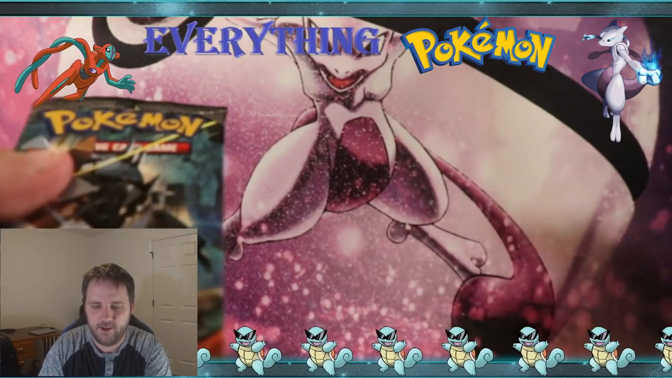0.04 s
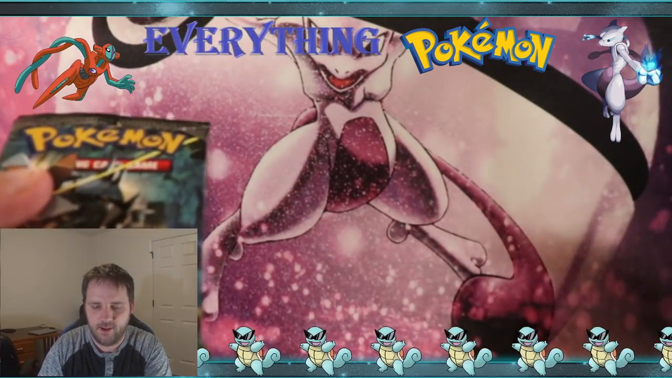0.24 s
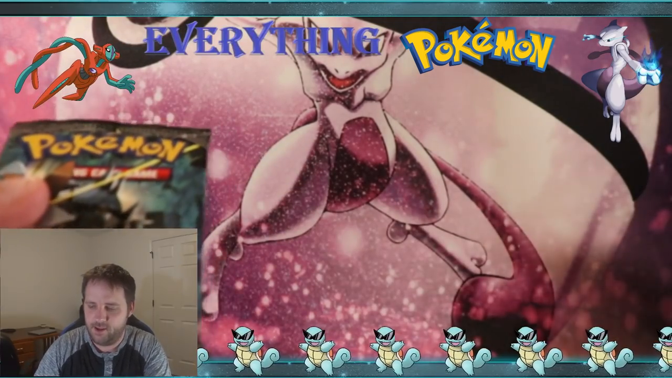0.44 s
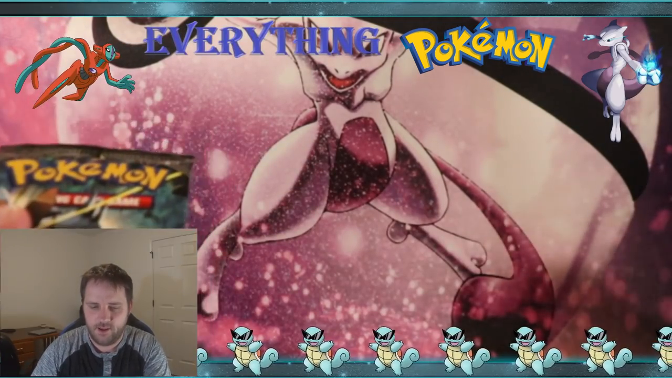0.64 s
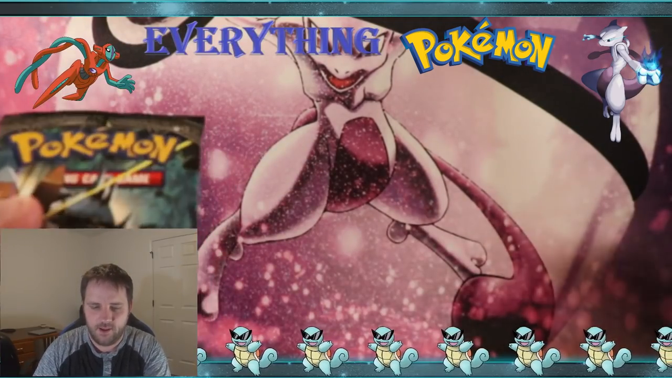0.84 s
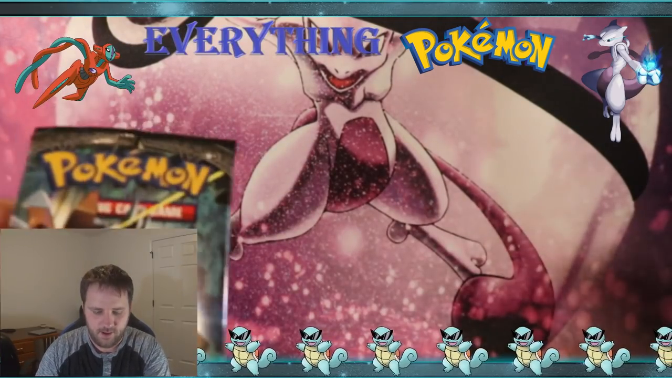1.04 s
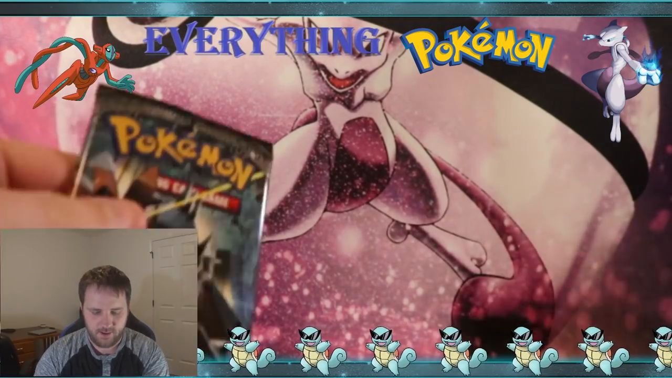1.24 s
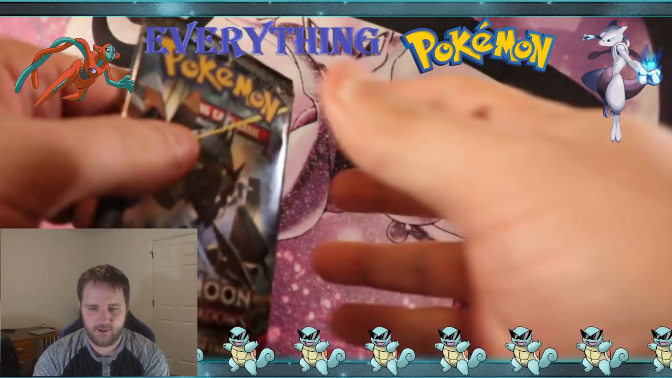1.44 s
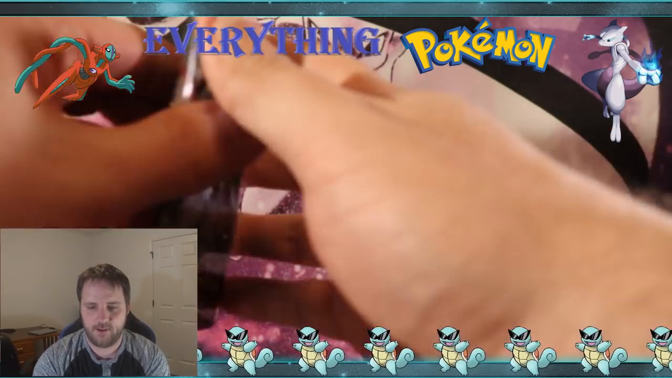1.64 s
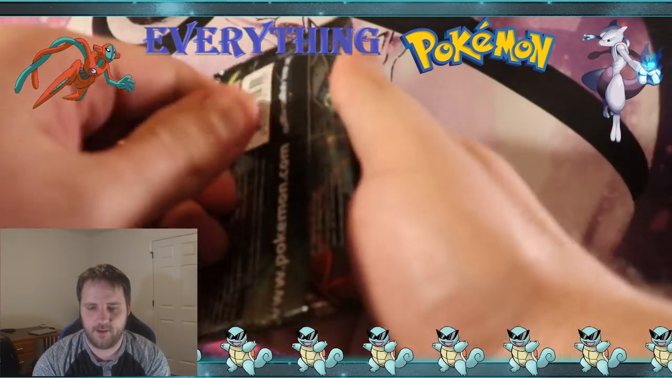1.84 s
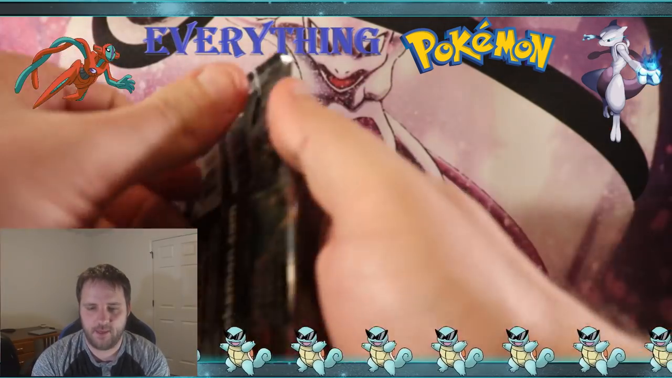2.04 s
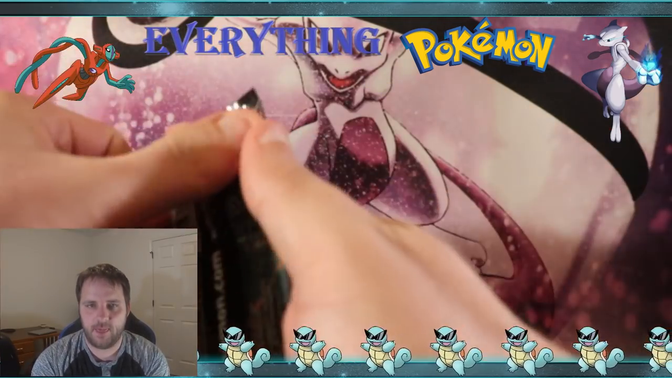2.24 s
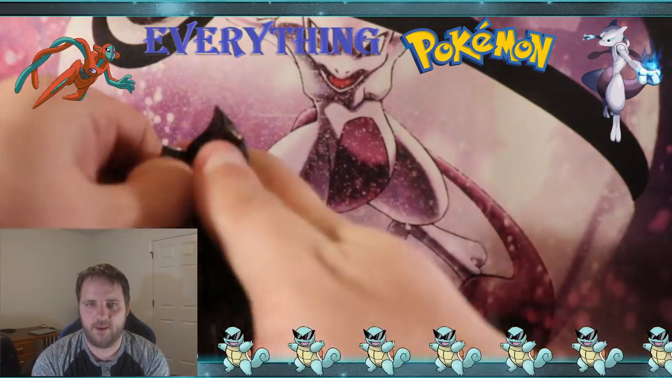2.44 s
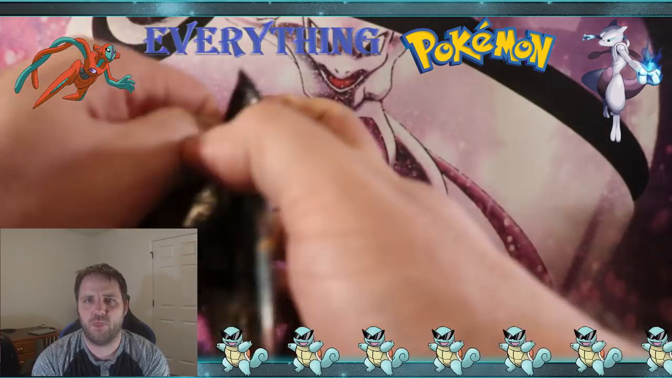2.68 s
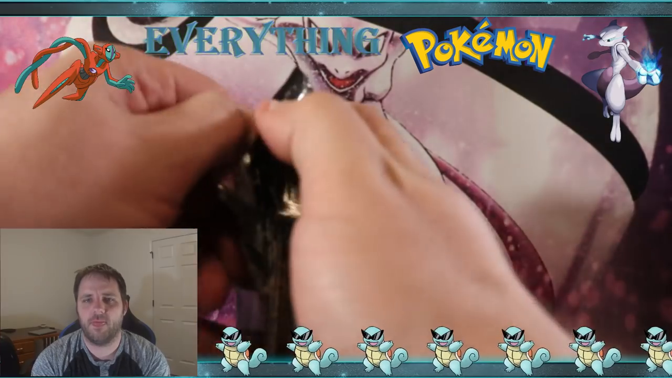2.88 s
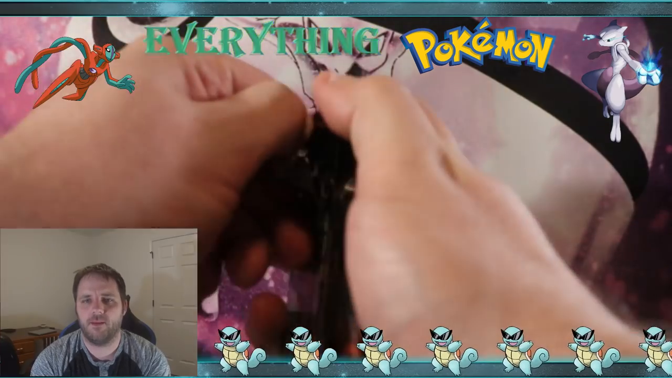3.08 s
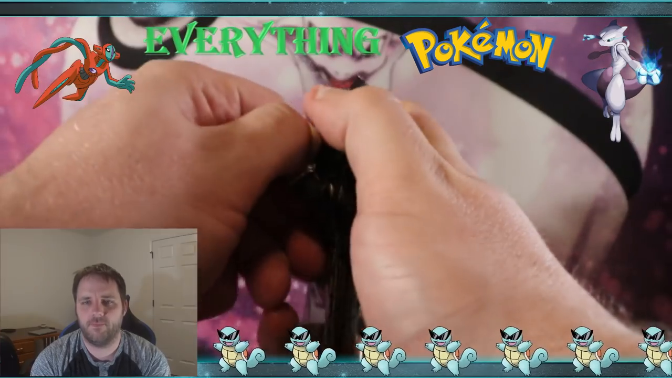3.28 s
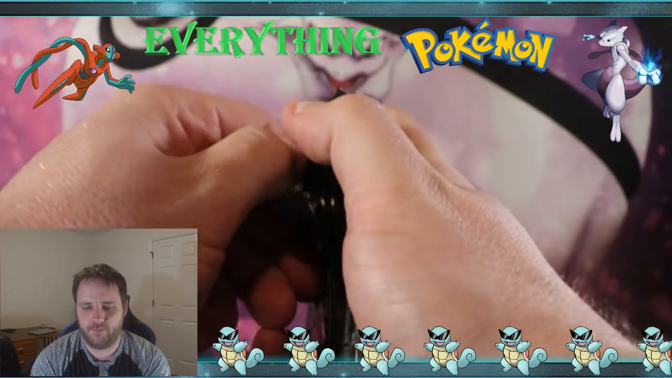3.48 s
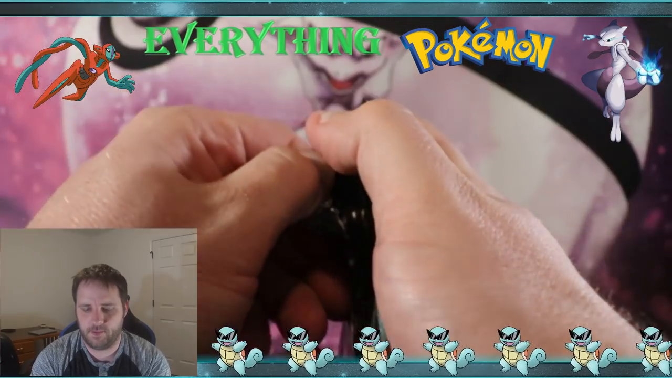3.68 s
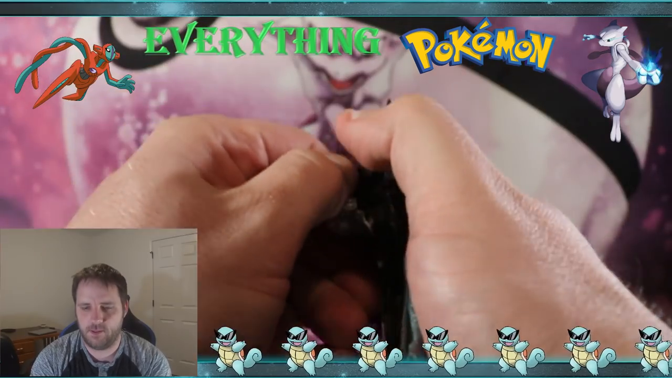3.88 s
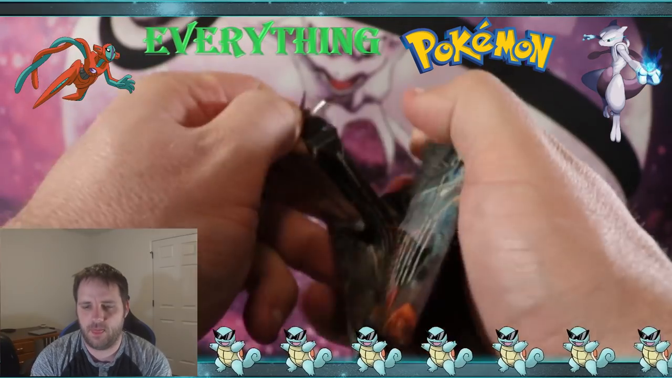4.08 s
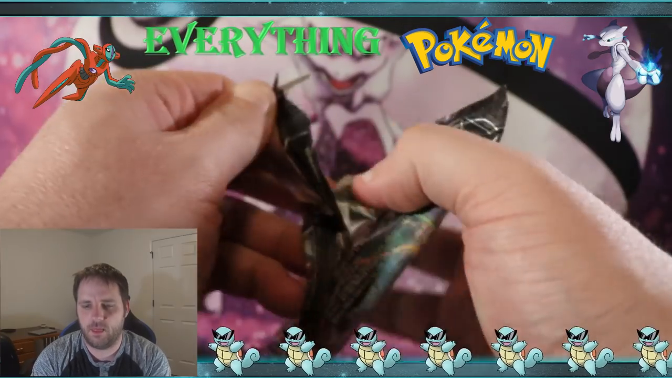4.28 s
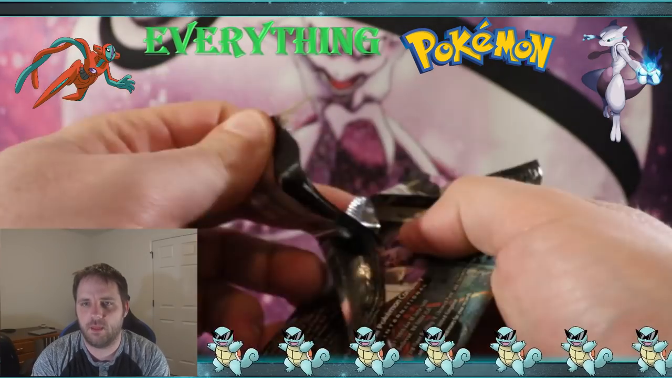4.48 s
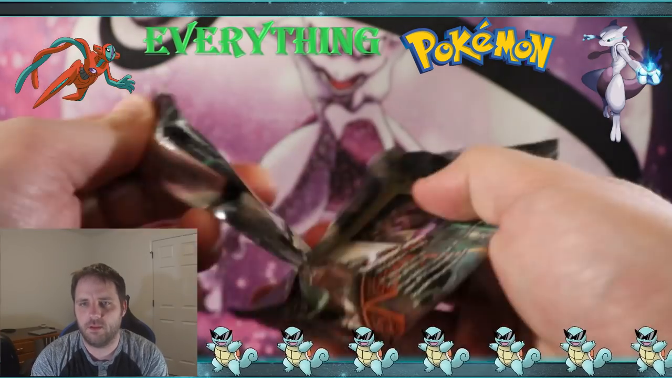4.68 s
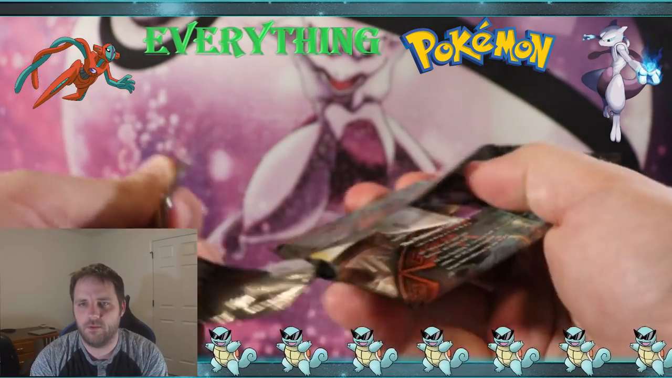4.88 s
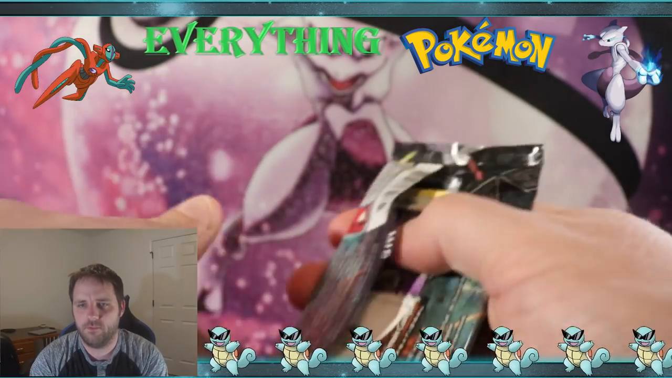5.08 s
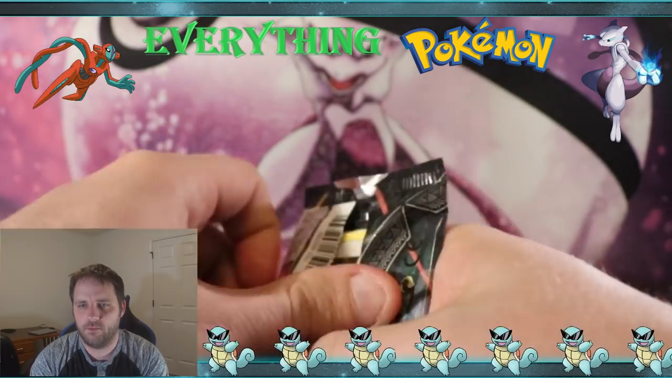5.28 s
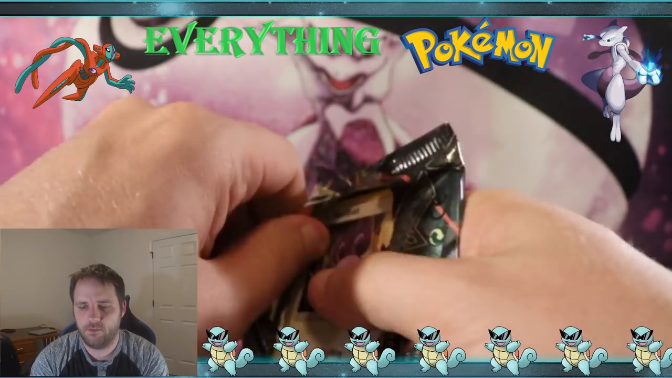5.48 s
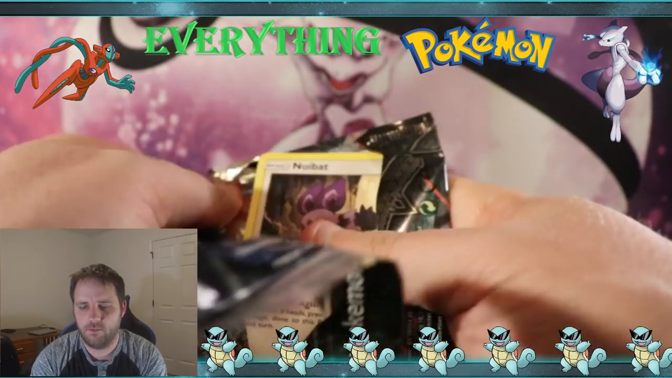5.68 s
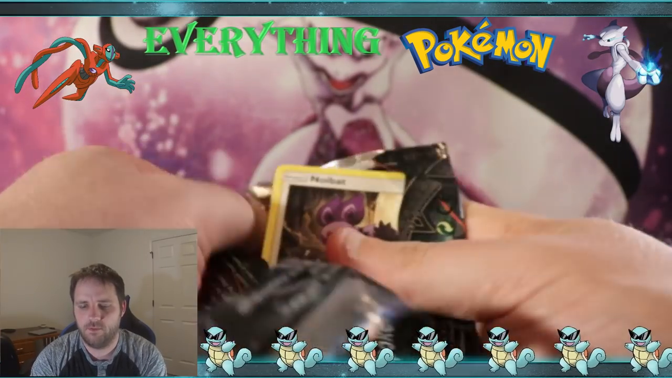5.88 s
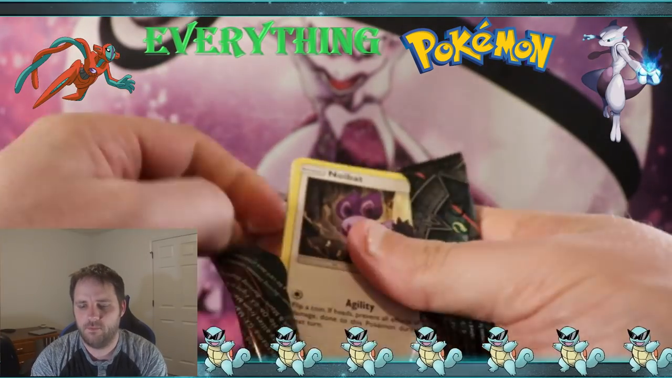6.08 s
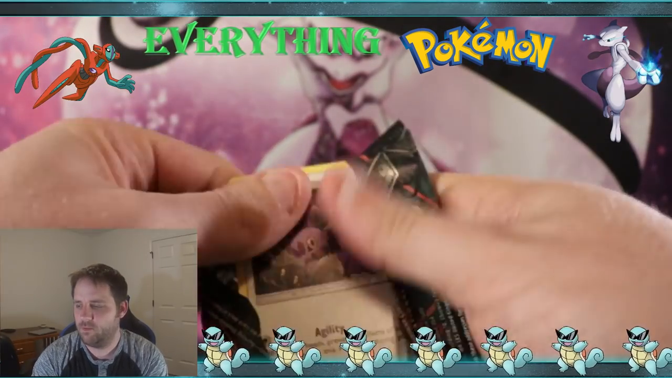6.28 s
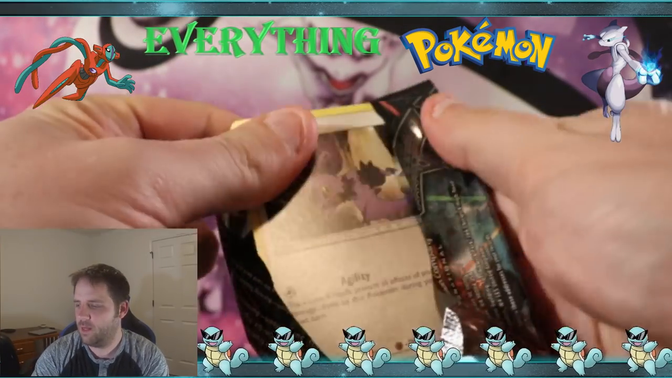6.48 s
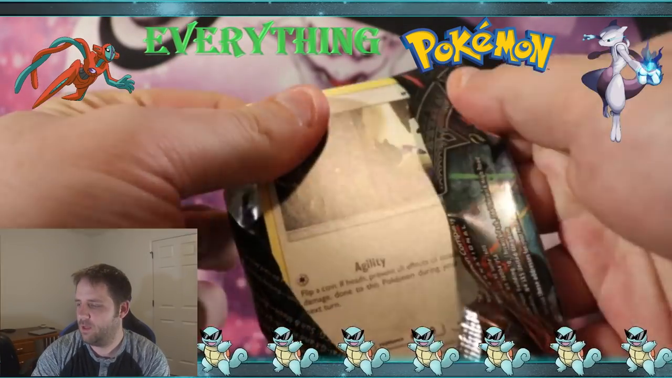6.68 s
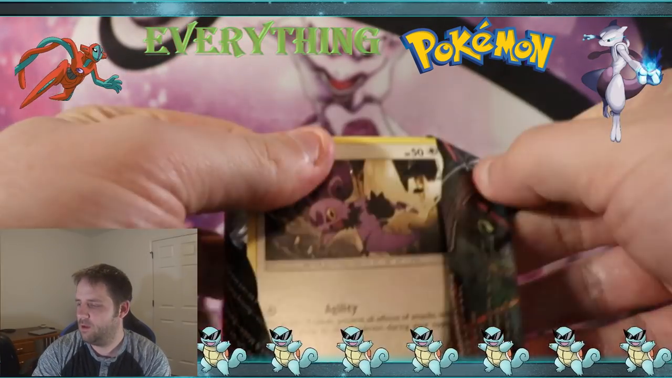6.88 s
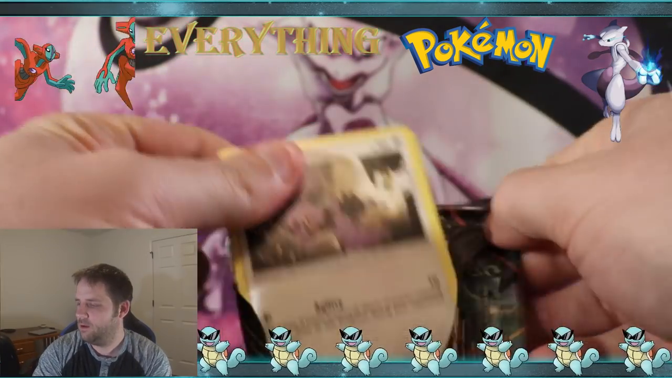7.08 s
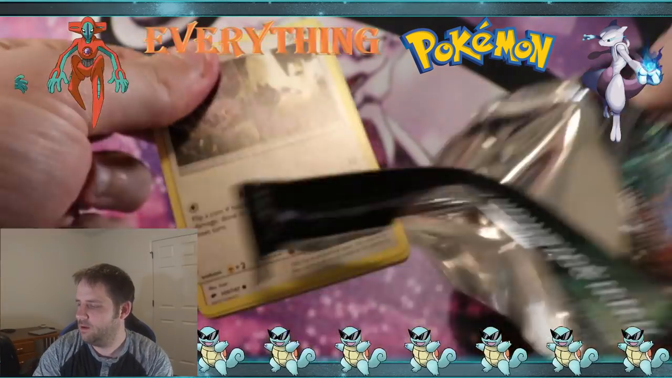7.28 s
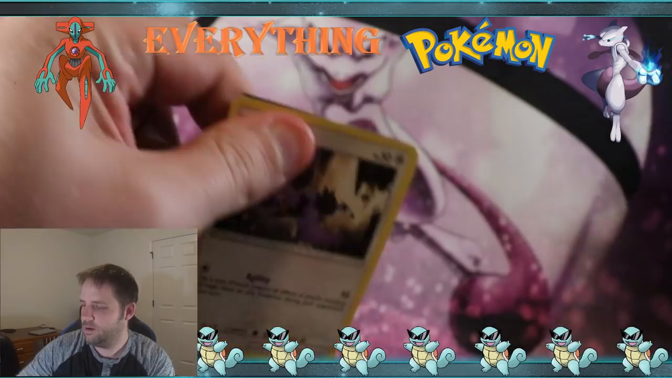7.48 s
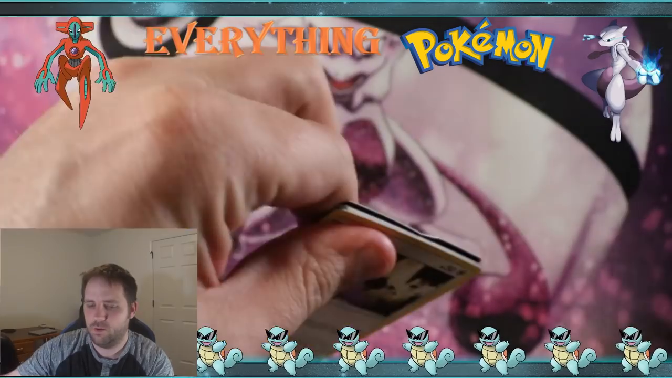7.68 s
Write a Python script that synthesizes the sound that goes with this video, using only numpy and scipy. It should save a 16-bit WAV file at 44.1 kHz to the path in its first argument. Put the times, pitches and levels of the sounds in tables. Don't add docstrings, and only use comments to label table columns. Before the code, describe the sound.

Hands work a glossy foil wrapper over a desk, heard at a little distance by one microphone. Soft rubbing and isolated clicks come first, then bright scattered pops, a pause, a sudden ripping crackle, and busy papery crinkling as the flap peels and cards come free. Dull knocks sit underneath; hard walls briefly answer each snap over a low steady room tone.

```python
import sys
import numpy as np
from scipy import signal
from scipy.fft import rfft, irfft
from scipy.io import wavfile

SR = 44100
rng = np.random.default_rng(int(sys.argv[2]) if len(sys.argv) > 2 else 0)


def transcribe(u):
    v = np.clip(np.atleast_2d(u).T, -1, 1)
    q = np.round(v * 32767).astype(np.int16)
    wavfile.write(sys.argv[1], SR, q)


def natural_amplitude(level_db):
    exponent = np.asarray(level_db, float) / 20
    return 10 ** exponent


N = 340363
LEAD = 4096
BODY_HZ = 1800
MIDDLING_DB = -18.5

# (frequency [Hz], level [dB per Hz])
FOIL_COLOUR = [(180, -26.5), (300, 16.5), (600, 6.5), (850, 3.5), (1100, -2), (1650, -1.5), (2270, -1),
               (2900, 3), (5000, 3.5), (7000, 4), (8200, 3.5), (9200, -6.5), (11500, -16), (13000, -19),
               (14500, -30.5), (16000, -73.5)]


def snaps():
    # (time [s], peak [dB], ring [Hz], body 0.7-1.8 kHz [dB], share to the walls [dB])
    earlier_snap = [
        (-0.02, -24, 9500, -27, 2.7),
    ]
    lift_snaps = [(0.1475, -44, 2000, -9, 3), (0.256, -45.5, 4500, -28, 12), (0.748, -47.5, 2010, -15, 12),
                  (0.775, -46, 1325, -15, 7), (0.796, -40.5, 2900, -8, 4), (0.8095, -39, 2490, -6, 1),
                  (0.816, -46, 3300, -20, 0), (0.827, -43, 2600, -20, 0), (0.845, -50, 3500, -20, 0),
                  (0.862, -48, 2300, -15, -2), (0.877, -42, 1950, -7, 5), (0.889, -41, 1040, -6, 4),
                  (0.9, -31.5, 7950, -11, 2), (0.9589, -20, 4260, -12.5, 0.5),
                  (1.062, -37.5, 3810, -20, 13), (1.1375, -21.5, 4460, -21, 3),
                  (1.144, -28.5, 4860, -22, -4), (1.453, -51.5, 1120, -31, 7.5), (1.662, -48, 2760, -26, 8),
                  (1.732, -50, 2190, -25, 20), (1.7892, -29, 2730, -17.5, 2), (1.843, -17.5, 4230, -29, 0),
                  (1.945, -29.5, 4840, -18, -1.5), (2.0192, -36.5, 3100, -22, 5),
                  (2.0528, -16.5, 3100, -49, -2), (2.089, -13, 4100, -33, -4)]
    grip_snaps = [(2.271, -12.5, 4100, -25.5, -0.5), (2.356, -27.5, 4840, -44, 2),
                  (2.395, -11, 2880, -46, -5.5), (2.4441, -12.5, 8700, -17, -0.5),
                  (2.4629, -14, 5860, -25, -4), (2.5249, -12, 8400, -35, -4), (2.55, -23, 6100, -32, -1),
                  (2.591, -20, 6600, -20.5, 1.5), (2.6502, -18.5, 7160, -20, 1.5),
                  (2.703, -30, 2780, -12.5, 8), (2.7396, -22, 3800, -12.5, -2), (2.749, -28, 3800, -24, 7),
                  (2.7874, -6, 2800, -19.5, -5), (2.875, -28, 3650, -7, 5), (2.923, -12, 3900, -28, -1),
                  (3.0742, -39, 2670, -10, 10), (3.129, -37, 7650, -25, 3), (3.152, -28.5, 9000, -47, 3.5),
                  (3.196, -26.5, 9300, -29, 4), (3.2233, -24, 7100, -33, 5.5), (3.4032, -49, 5310, -34, -5),
                  (3.579, -46, 8100, -38, 8), (3.6158, -46, 7200, -32, 7), (3.7168, -32, 5600, -51, 6),
                  (3.755, -38.5, 4940, -46, 7.5), (3.863, -23.5, 7200, -60, 2), (3.996, -46, 3210, -27, 0)]
    tear_snaps = [(4.0368, -57, 3010, -30, 0), (4.0488, -26.5, 7100, -43, -6), (4.0625, -21, 2880, -20, 2),
                  (4.0674, -12.5, 3000, -15.5, -2), (4.077, -9, 2720, -23, 3.5),
                  (4.0823, -1.5, 6600, -42, -4), (4.0891, -3, 2950, -16, -2),
                  (4.098, -10, 4630, -15.5, 1.5), (4.2587, -17.5, 1110, -19, -6),
                  (4.3508, -33.5, 3000, -13, 8.5), (4.381, -26, 2860, -11.5, 4),
                  (4.3915, -16.5, 3860, -14, -4.5), (4.5304, -20, 2920, -18.5, 0),
                  (4.5604, -24, 2780, -10.5, -1.5), (4.6002, -25, 2720, -19, 2.5),
                  (4.6683, -35, 3100, -13, 1), (4.6863, -26.5, 3560, -22, 5.5),
                  (4.699, -23.5, 7000, -18, 0.5), (4.7249, -22.5, 3050, -23, 5),
                  (4.7357, -22, 3700, -17, -5), (4.74, -19, 3500, -12.5, -5), (4.7565, -16, 1520, -18, -18),
                  (4.7669, -8.5, 4200, -8, -6.5), (4.8188, -8.5, 2960, -24, -5),
                  (4.847, -15, 7200, -21, -1), (4.8637, -14, 7650, -19, 1.5), (4.872, -17, 7400, -13.5, 5),
                  (4.904, -21, 4960, -13, -4), (4.9632, -30, 6100, -26, 9), (5.011, -42.5, 2570, 5, 10),
                  (5.041, -20.5, 3200, -41, -0.5), (5.1224, -30.5, 8080, -9, 7.5),
                  (5.1412, -11.5, 6900, -35, -0.5), (5.1412, -12, 2140, -14.5, -3.5),
                  (5.162, -25.5, 2270, -23, 9), (5.2892, -36.5, 3800, -11.5, 9.5),
                  (5.354, -30.5, 2500, -39, 1)]
    peel_snaps = [(5.434, -45.5, 2630, -3, 18.5), (5.449, -25.5, 6740, -23, -2),
                  (5.4916, -39, 3170, -12, 5), (5.5051, -20, 2980, -17, 8), (5.508, -20, 2800, -25, -9),
                  (5.531, -25, 3850, -14, -7), (5.5541, -14, 6500, -14.5, -3.5),
                  (5.5852, -17, 4240, -28, -4), (5.603, -22, 4420, -36, -18), (5.656, -20, 2960, -22, -11),
                  (5.6636, -10, 2600, -16.5, -4), (5.7225, -13, 1380, -8, -1), (5.759, -22, 5270, -9, 3),
                  (5.771, -19, 6940, -24, 3.5), (5.7808, -11, 2500, -15, 1), (5.79, -16.5, 1400, -17, -3),
                  (5.8022, -13, 7100, -25, -2), (5.882, -19.5, 2900, -5.5, -1.5),
                  (5.8837, -12.5, 9550, -28, -1.5), (5.941, -18.5, 3700, -16, -3.5),
                  (5.9935, -22, 1400, -9.5, 2), (6.001, -25, 4250, -18, 10), (6.0208, -24, 4050, -7, 0),
                  (6.043, -25.5, 886, 4, -2), (6.0623, -16, 1040, -37, -3), (6.106, -29, 1320, -12, -8),
                  (6.1834, -27, 8550, -3, 5), (6.189, -29.5, 876, -17, 4), (6.235, -22.5, 955, -1.5, -3),
                  (6.2446, -18, 3100, -9.5, -2.5), (6.276, -22.5, 3070, -31, -5),
                  (6.3037, -23, 1380, -6.5, -1.5), (6.328, -26.5, 1390, -3, 3)]
    pull_snaps = [(6.359, -23, 3840, -27, 11), (6.3727, -5, 3550, -17.5, -8),
                  (6.39, -12, 3570, -10.5, -10.5), (6.5066, -33.5, 3520, -8.5, 9.5),
                  (6.548, -26.5, 4500, -16, 8.5), (6.5634, -15.5, 3600, -42, 0),
                  (6.586, -16, 3980, -11.5, -0.5), (6.654, -26.5, 4100, -16, -9),
                  (6.7178, -37, 5340, -8.5, -1), (6.7457, -27, 3080, -14, 2), (6.795, -21, 7340, -20, 3.5),
                  (6.8056, -21, 1610, -16, -2), (6.8445, -24, 3000, -25, 5.5), (6.9246, -32, 4470, -19, 3),
                  (6.9403, -12, 7400, -43, -4.5), (6.995, -23, 2930, -12.5, 1),
                  (7.1512, -36.5, 1420, -4, 3), (7.176, -22, 2500, -11, -6), (7.1797, -13, 2900, -5.5, -4),
                  (7.1872, -4.5, 3000, -22, -3.5), (7.237, -28.5, 1420, 4.5, -7),
                  (7.2726, -22, 7030, -27, 7.5), (7.279, -29, 1380, -4, 4), (7.298, -20, 1460, -18, -2),
                  (7.3418, -9.5, 3580, -14.5, -5), (7.4092, -23, 7800, -9.5, -0.5),
                  (7.4944, -35.5, 2120, -7, 7.5), (7.674, -48, 1880, -5.5, 12),
                  (7.7157, -22.5, 9000, -26.5, -2.5)]
    # (time [s], peak [dB], ring [Hz])
    ticks = [(0.0028, -34.5, 1660), (0.8966, -44, 1680), (1.0176, -43, 1540), (1.051, -40, 1640),
             (1.1283, -37, 3060), (1.152, -35, 4900), (1.8592, -25, 7880), (1.9016, -34, 7620),
             (2.077, -32, 6340), (2.4411, -26, 4000), (2.4535, -20, 8200), (2.7324, -32, 4520),
             (2.9, -38, 1640), (3.2169, -37, 8570), (3.26, -36, 4520), (3.538, -52, 6500),
             (3.558, -51, 7000), (3.8883, -43, 7100), (4.1925, -18, 2950), (4.4771, -44, 5080),
             (4.5072, -41, 4740), (4.5836, -35, 2630), (4.6206, -38, 2580), (4.6455, -42.5, 2150),
             (4.706, -28, 5700), (4.9708, -41, 7660), (5.1935, -34, 1380), (5.1972, -21.5, 1470),
             (5.3174, -36, 7540), (5.3805, -40, 7360), (5.574, -31, 6420), (5.579, -28, 5770),
             (5.5984, -21, 2800), (5.6156, -30, 5250), (5.6939, -32, 7240), (5.7505, -26, 1030),
             (5.8669, -29, 6120), (6.0051, -26, 4450), (6.1673, -48, 1250), (6.3231, -34, 1380),
             (6.3483, -34, 3230), (6.3994, -18.5, 2330), (6.4759, -38, 3830), (6.6602, -39, 4820),
             (6.6705, -39, 2840), (6.6956, -38, 1250), (6.822, -27, 1800), (6.868, -34, 3000),
             (6.951, -22, 7020), (6.9581, -25, 7240), (6.9908, -27, 1720), (7.1843, -19, 1210),
             (7.2301, -23, 1550), (7.25, -27, 3190), (7.5016, -41, 1190)]
    tick_body_db, tick_wall_db = -24, -1
    rows = earlier_snap + lift_snaps + grip_snaps + tear_snaps + peel_snaps + pull_snaps
    rows = rows + [(*tick, tick_body_db, tick_wall_db) for tick in ticks]

    slip_share, slip_rise_s, slip_t60_s = 0.26, 0.0004, 0.005
    length = 400
    t = np.arange(length) / SR
    slips = slip_share * rng.standard_normal((len(rows), length))
    slips = slips * np.tanh(t / slip_rise_s) * natural_amplitude(-60 * t / slip_t60_s)
    first_blow = t == 0
    direct = cracks(rows, 0.85 * first_blow + slips, 0.49, 2.9)
    around = cracks(rows, first_blow + slips / 3, 0.29, 0.1)

    # (delay [s], level [dB])
    near_echoes = [
        (.0007, -5.5),
        (.0016, -6.5),
    ]
    shifts = 1 + 0.12 * rng.uniform(-1.1, 1, (len(rows), 2))
    signs = np.sign(slips[:, 9])
    wall_base_db, wall_db_per_db = 2.5, 0.26
    out = np.zeros((6, LEAD + N + 600))
    for k, (s, peak_db, _, _, wall_db) in enumerate(rows):
        position = k % 3
        at = LEAD + round((s - slip_rise_s) * SR)
        out[position, at:at + length] += natural_amplitude(peak_db - 3.6) * signs[k] * direct[k]
        for (lag_s, echo_db), shift in zip(near_echoes, shifts[k]):
            later = at + round(lag_s * shift * SR)
            out[position, later:later + length] += natural_amplitude(peak_db - 2.0 + echo_db) * signs[k] * direct[k]
        to_walls_db = peak_db + wall_base_db + wall_db + wall_db_per_db * (peak_db - MIDDLING_DB)
        out[3 + position, at:at + length] += natural_amplitude(to_walls_db) * around[k]
    return out[:, :LEAD + N]


def cracks(rows, blows, ring_share, boom_db):
    def peak_one(x):
        return x / np.abs(x).max(axis=-1, keepdims=True)

    _, peak_db, hz, body_db, _ = np.transpose(rows)[:, :, None]
    sparkle_hz = 5310
    broad = coloured(blows, FOIL_COLOUR)
    facet = np.array([resonance(blow, f, 0.1 * f + 130) for blow, f in zip(blows, hz[:, 0])])
    octaves = np.log2(hz / 3000)
    middle_db = -1.5 * octaves
    sparkle_db = -15 + 3 * octaves + 0.3 * (peak_db - MIDDLING_DB)
    bright = ring_share * peak_one(facet)
    bright = bright + 0.5 * natural_amplitude(middle_db) * peak_one(band(broad, BODY_HZ, sparkle_hz))
    bright = bright - natural_amplitude(sparkle_db + 7.0) * peak_one(band(broad, sparkle_hz, 14000))
    body = peak_one(band(broad, 700, BODY_HZ))
    return peak_one(bright) - natural_amplitude(body_db + boom_db) * body


def crackle():
    # (time [s], held [s], level [dB], body 0.7-1.8 kHz [dB])
    hand_moves = [(0.0, 0.0029, -44.5, -16), (0.15, 0.1, -85, 3), (0.8, 0.035, -60, 4),
                  (0.875, 0.04, -59.5, 1), (0.96, 0.22, -52.5, -2.5), (1.9, 0.026, -49, -23),
                  (2.12, 0.25, -58, -14), (2.455, 0.015, -33, -28), (2.55, 0.16, -57, -20),
                  (3.05, 0.044, -49.5, -33), (3.95, 0.033, -60, -43), (4.102, 0.074, -30, -4),
                  (4.22, 0.0093, -44, 23), (4.4, 0.324, -57, 3), (4.769, 0.09, -34.5, -3),
                  (4.85, 0.013, -38, -20), (4.96, 0.13, -55, 1), (5.169, 0.035, -42.5, 1),
                  (5.35, 0.28, -53, -2), (5.619, 0.041, -38.5, -4.5), (5.78, 0.0068, -41, 11),
                  (5.9, 0.28, -52, 9.5), (6.28, 0.11, -56, 11), (6.399, 0.0059, -33.5, -4),
                  (6.57, 0.14, -50.5, 0.5), (6.8, 0.14, -45, -3.5), (7.193, 0.058, -33.5, 2.5),
                  (7.4, 0.19, -62.5, 3)]
    power = swells(hand_moves, 412, 222)
    linger_db, linger_db_per_s, still_db = -30, 41, -102
    power = power + natural_amplitude(linger_db) ** 2 * swells(hand_moves, 2 * linger_db_per_s, linger_db_per_s)
    total = power.sum(0) + natural_amplitude(still_db) ** 2
    level_db = every_sample(10 * np.log10(total))
    body_db = every_sample(np.transpose(hand_moves)[3] @ power / total)

    per_s = np.clip(1200 * natural_amplitude(0.77 * (level_db + 44.5)), 500, 9000)
    sizes = natural_amplitude(4.5 * np.minimum(rng.exponential(1, (3, N)), 4)) * rng.choice([-1, 1], (3, N))
    struck = rng.random((3, N)) < per_s / 3 / SR
    clicks = coloured(sizes * struck / np.sqrt(per_s), FOIL_COLOUR)
    sparkle_db = np.clip(0.92 * (level_db + 56.0), -16, 0)
    bright = band(clicks, BODY_HZ, 5050) - natural_amplitude(sparkle_db) * band(clicks, 6600, 19000)
    body = rms_one(band(clicks, 660, BODY_HZ))
    walls = natural_amplitude(level_db - 12.5) * (rms_one(bright) - natural_amplitude(body_db - 0.5) * body)
    flips = pips(level_db - 12.0)
    direct = natural_amplitude(-18.0) * walls + flips
    around = walls + natural_amplitude(0.5) * flips
    return np.pad(np.vstack([direct, around]), [(0, 0), (LEAD, 0)])


def pips(level_db):
    pips_per_s, pips_db, ring_cycles = 180, -2.5, 19
    sizes = natural_amplitude(3 * np.minimum(rng.exponential(1, N), 3)) * (rng.random(N) < pips_per_s / SR)
    pitches = np.geomspace(1800, 8000, 15)
    dealt = rng.integers(0, 15, N)
    out = np.zeros((3, N))
    for k, hz in enumerate(pitches):
        hits = sizes * (dealt == k) + 1e-18
        out[k % 3] += np.sqrt(hz) * resonance(hits, hz, 1.1 * hz / ring_cycles)
    return natural_amplitude(level_db + pips_db) * rms_one(coloured(out, FOIL_COLOUR))


def squeak():
    # (time [s], held [s], level [dB], pitch [Hz])
    skin_slips = [
        (1.372, 0.018, -66, 1350),
        (6.872, 0.044, -53, 2010),
        (1.33, .08, -59.5, 230),
        (5.852, 0.024, -47, 274),
        (5.875, 0.037, -44.5, 200),
    ]
    out = np.zeros(N)
    for power, (_, _, _, hz) in zip(swells(skin_slips, 2000, 900), skin_slips):
        out += every_sample(np.sqrt(power)) * rms_one(resonance(rng.standard_normal(N), hz, 30))
    return out


def rub():
    # (time [s], held [s], level [dB])
    slides = [
        (0.08, 0.45, -65.5),
        (0.45, 0.12, -75),
        (0.8, 0.1, -60.5),
    ]
    height = every_sample(np.sqrt(swells(slides, 150, 55.7).sum(0)))
    return height * rms_one(band(rng.standard_normal(N), 1170, 3250))


def desk():
    # (time [s], held [s], level [dB])
    leans = [
        (0.98, 0.23, -48.5),
        (1.5, 0.33, -58.5),
        (3.4, 0.077, -58),
        (4.0, 0.06, -49.5),
        (4.15, 0.079, -42.5),
        (7.6, 0.043, -63),
    ]
    # (time [s], level [dB], pitch [Hz], decay
    # by 60 dB [s])
    knocks = [(0.962, -35, 140, 0.21), (1.468, -48, 409, 0.05), (1.735, -42, 320, 0.06),
              (1.76, -44, 45, 0.12), (1.79, -47, 185, 0.07), (4.088, -33, 69, 0.35),
              (5.831, -47.5, 324, 0.53), (4.259, -27.5, 1020, 0.06), (7.179, -37.5, 274, 0.056),
              (7.19, -32, 710, 0.081), (7.183, -27, 413, 0.068), (1.4, -53, 200, 0.11),
              (1.1, -46, 239, 0.09), (1.721, -44.5, 167, 0.14), (2.1, -45, 630, .05),
              (2.65, -46, 516, 0.045), (2.788, -44, 750, 0.044), (5.95, -46, 302, 0.17),
              (4.09, -39.5, 286, .1), (4.905, -33, 450, 0.02), (5.508, -39, 750, 0.064),
              (7.2, -33, 700, 0.027), (4.821, -27, 626, 0.029), (5.9, -45, 312, 0.22)]
    rest_db = -61
    t = np.arange(N) / SR
    height = every_sample(np.sqrt(swells(leans, 106, 92).sum(0) + natural_amplitude(rest_db) ** 2))
    out = height * rms_one(band(rng.standard_normal(N), 22.7, 60.5))
    for s, level_db, hz, t60 in knocks:
        since = np.clip(t - s, 0, None)
        out += natural_amplitude(level_db - 60 * since / t60) * np.sin(2 * np.pi * hz * since) * np.tanh(since / 0.00062)
    return out


def room(x):
    # (frequency [Hz], time to fall 60 dB [s])
    decay_times = [(300, 0.42), (1300, 0.27), (3500, 0.4), (9000, 0.35), (15000, 0.27)]
    # (frequency [Hz], level [dB])
    wall_colour = [(300, -7.5), (1500, 1.5), (3000, -2.5), (7500, 0), (15000, 4)]
    # (delay [s], level [dB])
    reflections = [
        (.007, -13),
        (.0076, -11.5),
        (.0081, -12),
        (.0087, -12),
        (.0102, -18.5),
        (0.0162, -19.5),
    ]
    tail_db, tail_start_s = -0.5, 0.0022
    t = np.arange(SR // 2) / SR
    edges = 250 * 2 ** np.arange(0, 6.4, 0.5)
    white = rng.standard_normal((2, 3, len(t)))
    tails = np.zeros((3, len(t)))
    for k, (low, high) in enumerate(zip(edges, edges[1:])):
        t60 = at_hz(decay_times, np.sqrt(low * high))
        tails += band(white[k % 2], low, high) * natural_amplitude(-60 * t / t60)
    tails = coloured(tails * np.clip(t / tail_start_s - 0.5, 0, 1), wall_colour)
    direct = np.tile(1.0 * (t == 0), (3, 1))
    late = natural_amplitude(tail_db) * rms_one(tails) / np.sqrt(len(t))
    for s, level_db in reflections:
        lags = (s * SR * rng.uniform(0.93, 1.05, 3)).astype(int)
        late[[0, 1, 2], lags] += natural_amplitude(level_db)
    answers = np.vstack([direct, late])
    return signal.fftconvolve(x, answers, axes=1).sum(0)[LEAD:LEAD + N]


def background():
    # (frequency [Hz], level [dB per Hz])
    hiss_colour = [(53, -31.5), (100, -14.5), (200, -1), (400, -12), (560, -25), (800, -15), (1000, -25.5),
                   (2500, -30.5), (7500, -29), (9500, -38.5), (12700, -45), (13100, -66)]
    # (frequency [Hz], width [Hz], level [dB])
    hum_bands = [
        (49.4, 2.7, -67),
        (123.6, 8, -61.5),
        (196.1, 8.4, -61),
    ]
    hiss_db = -55
    out = natural_amplitude(hiss_db - 6.5) * rms_one(coloured(rng.standard_normal(N), hiss_colour))
    for hz, width_hz, level_db in hum_bands:
        out += natural_amplitude(level_db) * rms_one(resonance(rng.standard_normal(N), hz, width_hz))
    return out


def swells(rows, rise_db_per_s, fall_db_per_s):
    t = np.arange(0, N, 32) / SR
    s, held, level_db = np.transpose(rows)[:3, :, None]
    rise_db = rise_db_per_s * np.clip(s - t, 0, None)
    fall_db = fall_db_per_s * np.clip(t - s - held, 0, None)
    return natural_amplitude(level_db - rise_db - fall_db) ** 2


def every_sample(coarse):
    return np.interp(np.arange(N) / 32, np.arange(len(coarse)), coarse)


def rms_one(x):
    return x / np.sqrt(np.mean(x ** 2) + 1e-20)


def at_hz(points, hz):
    return np.interp(np.log(hz), np.log(np.array(points)[:, 0]), np.array(points)[:, 1])


def band(x, low_hz, high_hz):
    return signal.sosfilt(signal.butter(2, [low_hz, high_hz], "band", fs=SR, output="sos"), x)


def coloured(x, spectrum):
    cepstrum = irfft(np.log(natural_amplitude(at_hz(spectrum, np.arange(1, 2050) * SR / 4096))))
    cepstrum[1:2048] *= 2
    cepstrum[2049:] = 0
    kernel = irfft(np.exp(rfft(cepstrum)))
    return signal.fftconvolve(np.atleast_2d(x), kernel[None], axes=1)[:, :x.shape[-1]].reshape(x.shape)


def resonance(x, hz, width_hz):
    r = np.exp(-np.pi * width_hz / SR)
    return signal.lfilter([1, 0, -1], [1, -2 * r * np.cos(2 * np.pi * hz / SR), r * r], x)


def scene():
    foil = room(snaps() + crackle())
    mono = foil + desk() + background() + squeak() + rub()
    return np.array([mono, mono])


def roll_off(x):
    return signal.sosfilt(signal.butter(12, 16460, fs=SR, output="sos"), x)


def record(dry):
    overload = 0.6
    dry = overload * np.tanh(dry / overload)
    dry = signal.sosfilt(signal.cheby2(12, 50, 16400, fs=SR, output="sos"), dry)
    dry = signal.sosfilt(signal.butter(4, 14500, fs=SR, output="sos"), dry)
    smear = rng.standard_normal(96) / np.sqrt(96)
    top = signal.sosfilt(signal.butter(8, [11700, 15300], "band", fs=SR, output="sos"), dry[0])
    apart = natural_amplitude(-3) * signal.fftconvolve(top, smear)[:N]
    return roll_off(dry + apart * [[1], [-1]])


dry = scene()
out = record(dry)
transcribe(out)
```